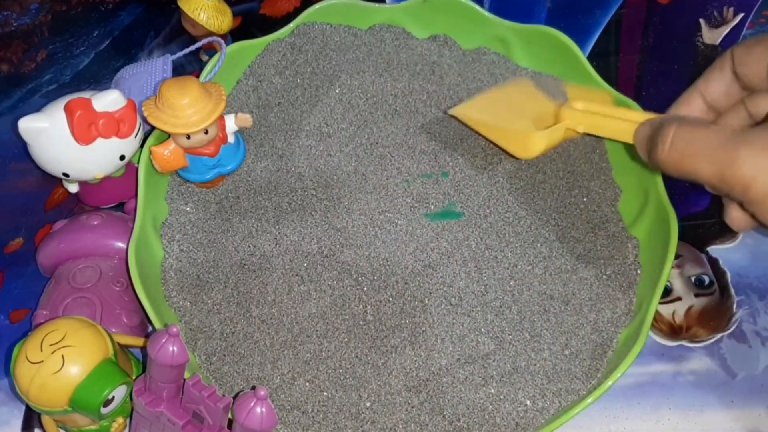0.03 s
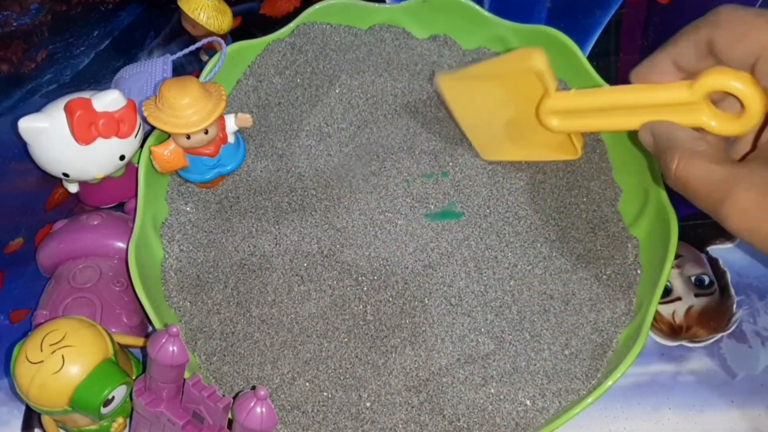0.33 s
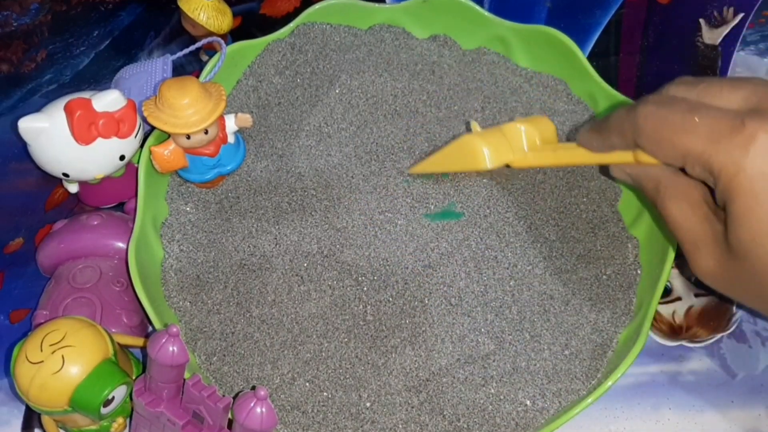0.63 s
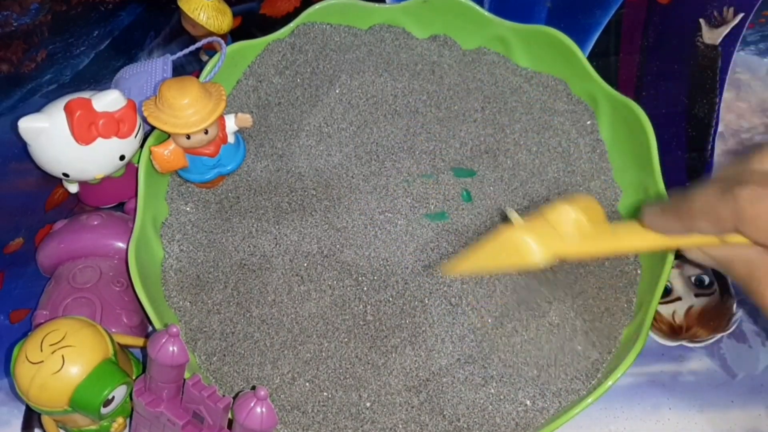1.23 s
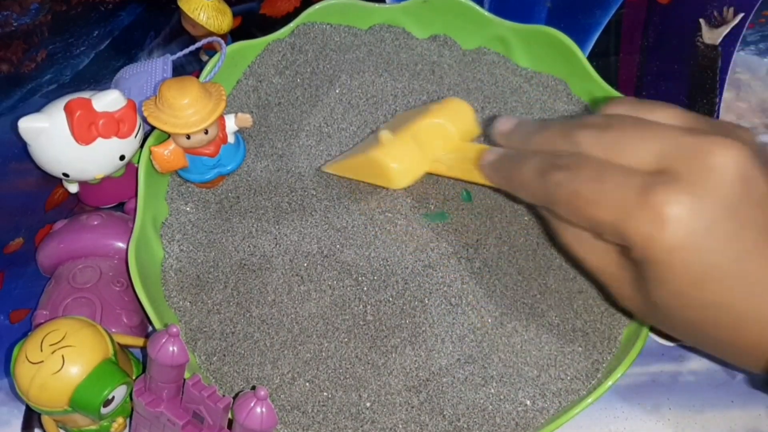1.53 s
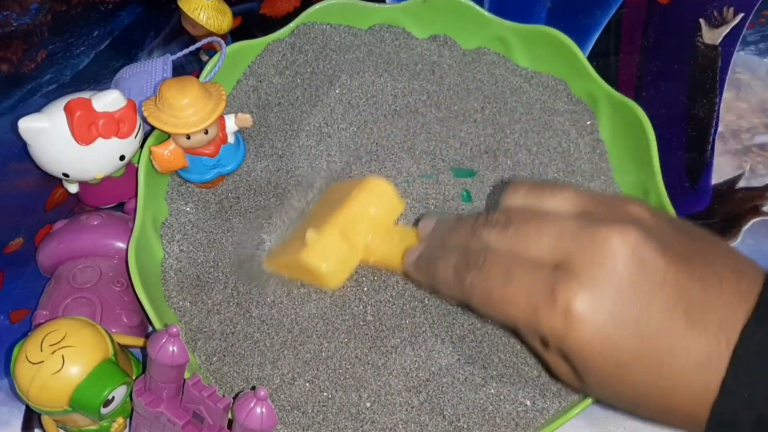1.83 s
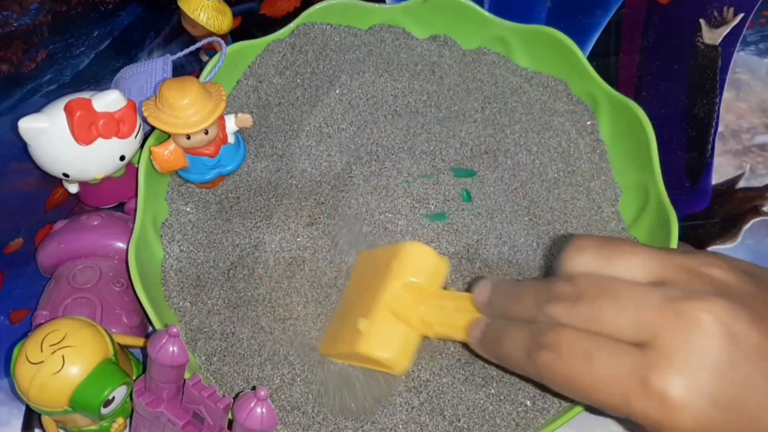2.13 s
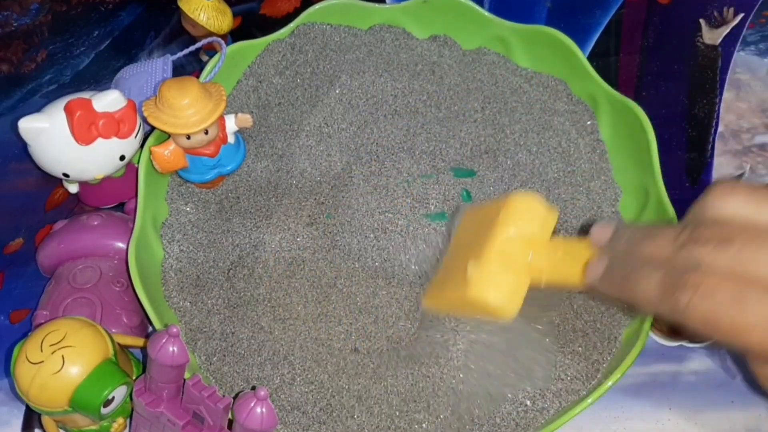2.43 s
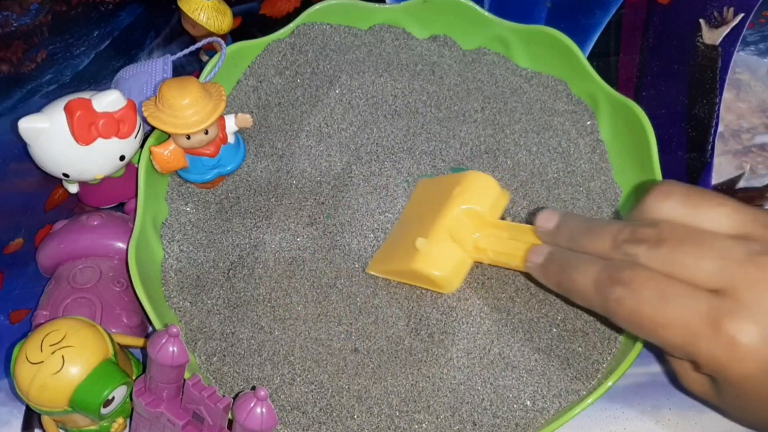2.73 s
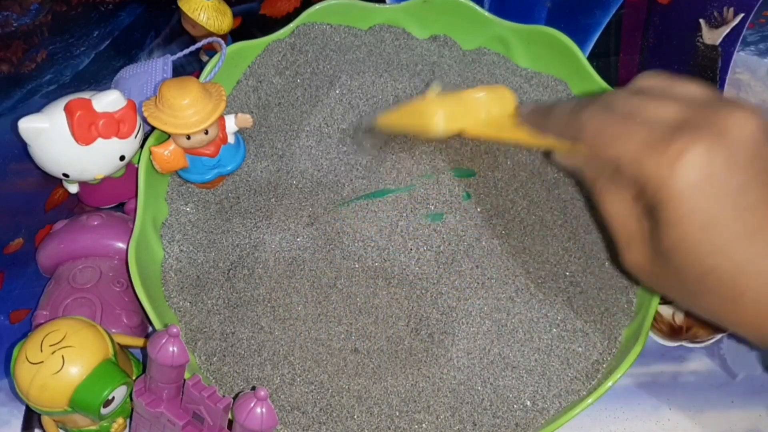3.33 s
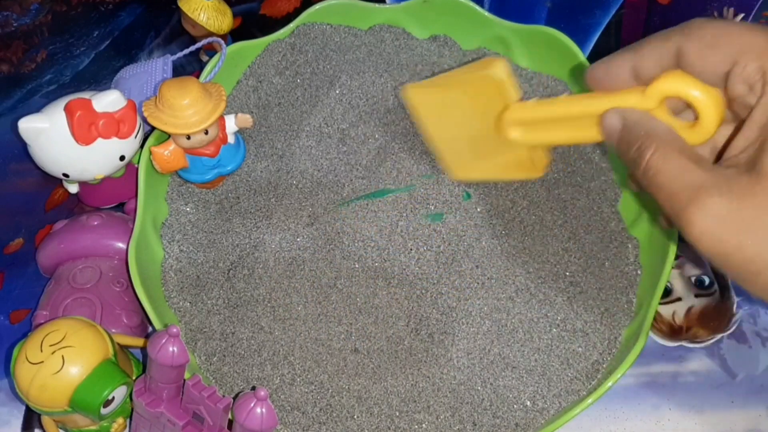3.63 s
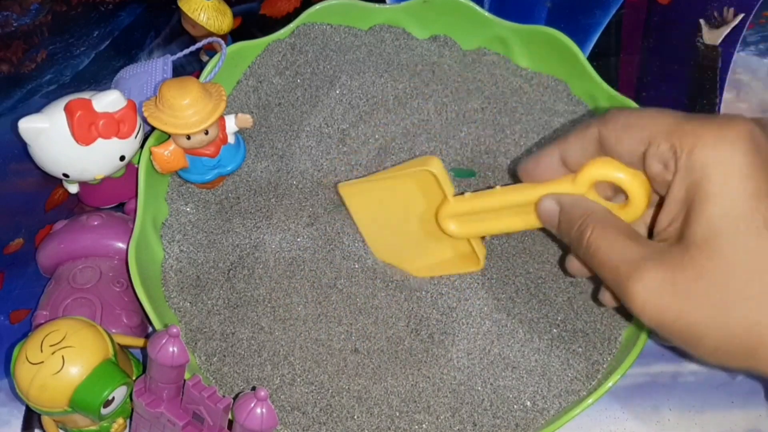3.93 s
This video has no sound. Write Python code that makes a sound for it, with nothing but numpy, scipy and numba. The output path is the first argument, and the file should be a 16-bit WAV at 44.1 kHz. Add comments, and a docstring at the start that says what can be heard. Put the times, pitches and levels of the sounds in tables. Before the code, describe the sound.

A plastic toy shovel scrapes dry sand in a tray, close by in a quiet room. A brief dab and light crunchy touches lead to a long, swelling hiss with small grain ticks, then one short final stroke.

```python
"""Toy shovel in dry sand.

A plastic shovel is dabbed and dragged through a plastic tray of sand, close by. Slipping grains hiss,
crunch and faintly ring the blade; coarse grains tick on it and the tray takes two soft bumps.
A quiet room hums behind. Near the end the sound drops out briefly; a new stroke follows, further right."""
import sys
import numpy as np
from scipy import signal
from scipy.fft import rfft, irfft
from scipy.io import wavfile
from numba import njit

SR = 44100
rng = np.random.default_rng(int(sys.argv[2]) if len(sys.argv) > 2 else 0)


def put_to_file(sound):
    """Save the sound as 16-bit audio at rate SR, in the file named by the first command-line argument."""
    columns = np.atleast_2d(sound).T  # one column per channel
    safe = np.clip(columns, -1, 1)
    whole_steps = np.round(safe * 32767)
    wavfile.write(sys.argv[1], SR, whole_steps.astype(np.int16))


N = 176400
TOP_HZ = 15700


def undb(db):
    """Decibels to gain."""
    return 10 ** (np.asarray(db) / 20)


def unit(x):
    """Scale to rms 1."""
    return x / np.sqrt(np.mean(x ** 2))


def curve(rows, column):
    """Table column, linearly interpolated in time."""
    rows = np.array(rows, float)
    return np.interp(np.arange(N) / SR, rows[:, 0], rows[:, column])


def colour(x, spectrum):
    """Filter by (f/Hz, level/dB) points; rms 1."""
    hz, db = np.array(spectrum, float).T
    bins_hz = np.maximum(np.fft.rfftfreq(N, 1 / SR), 1)
    gain = undb(np.interp(np.log(bins_hz), np.log(hz), db))
    return unit(irfft(rfft(x) * gain, N))


def pan(left_minus_right_db):
    """Constant-power stereo gains."""
    gains = undb(np.array([left_minus_right_db, -left_minus_right_db]) / 2)
    return gains / np.sqrt(np.mean(gains ** 2, axis=0))


def walk(per_s):
    """Random wander between unit-variance knots."""
    knots = rng.standard_normal(N // 20)
    return np.interp(np.arange(N) / SR * per_s, np.arange(len(knots)), knots)


@njit
def resonate(x, hz, width_hz):
    """State-variable band-pass, moving centre and width."""
    y, band_state, low_state = np.empty(len(x)), 0., 0.
    for i in range(len(x)):
        g, damping = np.tan(np.pi * hz[i] / SR), width_hz[i] / hz[i]
        band = (band_state + g * (x[i] - low_state)) / (1 + g * (g + damping))
        band_state = 2 * band - band_state
        low_state += 2 * g * band
        y[i] = damping * band
    return y


def resonate_twice(x, hz, width_hz):
    """Two band-passes in series per channel; rms 1."""
    sides = [resonate(resonate(side, hz, width_hz), hz, width_hz) for side in x]
    return unit(np.array(sides) / np.sqrt(width_hz))


def room():
    """Soft rumble and hiss with a wavering low hum."""
    # air spectrum: f/Hz, relative density/dB
    air_spectrum = [(20, -4), (90, -4.5), (160, -6), (250, -9), (400, -12), (600, -15), (900, -20.5),
                    (2500, -24), (7000, -27.5), (15000, -30.5)]
    # hum tones: f/Hz, level/dB
    hum_tones = [(60, -66.5), (164, -68)]
    air_db, shared_power = -54, 0.21
    air = np.sqrt(1 - shared_power) * rng.standard_normal((2, N))
    air += np.sqrt(shared_power) * rng.standard_normal(N)
    out = undb(air_db) * colour(air, air_spectrum)
    for hz, db in hum_tones:
        phase = 2 * np.pi * np.cumsum(hz + 3 * walk(per_s=12)) / SR
        out += undb(db) * unit(np.sin(phase) * undb(1.2 * walk(per_s=12)))
    return out


def tray_bumps():
    """The blade nudges the tray; sand damps its modes quickly."""
    # bumps: t/s, level/dB
    bumps = [(3.349, -42.5), (3.442, -49)]
    # loaded tray modes: f/Hz, relative level/dB, T60/s
    tray_modes = [(67, -9, 0.13), (105, -4.5, 0.26), (298, -6.5, 0.098), (510, 1.5, 0.019),
                  (690, -4, 0.037)]
    out = np.zeros(N)
    for start_s, bump_db in bumps:
        age_s = np.maximum(np.arange(N) / SR - start_s, 0)
        for hz, mode_db, t60_s in tray_modes:
            decay = np.exp(-np.log(1000) * age_s / t60_s)
            out += undb(bump_db + mode_db) * np.sin(2 * np.pi * hz * age_s) * decay
    return out


def grain_ticks():
    """Coarse grains snap on the blade: a dry crack, then short scatter from the tray."""
    # grain impacts: t/s, relative level/dB, centre f/Hz
    ticks = [(0.0405, -14, 6500), (.0492, -28, 5500), (0.077, -28, 5600), (.108, -37, 6000),
             (.1245, -32, 5960), (0.1487, -29, 5460), (0.155, -31, 4800), (.1923, -34.5, 5800),
             (.376, -34, 6640), (1.131, -18.5, 3600), (1.146, -28, 3900), (1.185, -29, 5400),
             (3.1968, -19, 6000)]
    snap_db, decay_s, tail_db, tail_s, relative_width = 1, 0.0007, -16.5, 0.0085, 0.53
    out, t = np.zeros((2, N)), np.arange(N // 50) / SR
    envelope = np.exp(-t / decay_s) + undb(tail_db) * np.exp(-t / tail_s)
    for start_s, db, hz in ticks:
        contact = envelope * rng.choice([-1., 1.], (2, len(t)))
        contact[:, 0] = undb(snap_db)
        centre_hz = np.full(len(t), float(hz))
        crack = np.array([resonate(side, centre_hz, relative_width * centre_hz) for side in contact])
        band_hz = [0.58 * hz, min(2.06 * hz, TOP_HZ)]
        crack = signal.sosfilt(signal.butter(4, band_hz, "band", fs=SR, output="sos"), crack)
        crack *= np.sqrt(np.sum(envelope ** 2) / np.sum(crack ** 2, axis=1, keepdims=True)) / 2
        i = int(start_s * SR)
        out[:, i:i + len(t)] += undb(db) * crack
    return out


def grains(per_s, spread_db=2.5):
    """Tiny impacts of uneven size, independent per channel."""
    hits = rng.random((2, N)) < per_s / SR
    signs = rng.choice([-1, 1], (2, N))
    sizes = undb(spread_db * np.minimum(rng.exponential(size=(2, N)), 4))
    return unit(hits * signs * sizes)


def grain_flow(crossfeed=0, coarse_db=-13):
    """Fine and coarse grains in motion."""
    impacts = grains(per_s=14000) + undb(coarse_db) * grains(per_s=260)
    return impacts + crossfeed * impacts[::-1]


def hollow_rub(effort_db):
    """Two resonances, as of air under the blade; they shift with it and narrow under pressure."""
    # rub track: t/s, relative level/dB, f/Hz
    track = [(.95, -80, 800), (1.12, -64, 950), (1.45, -65, 790), (1.67, -55.5, 760), (1.8, -64, 740),
             (2.12, -57.5, 910), (2.44, -53.5, 990), (2.8, -57, 940), (3.2, -57, 930), (3.3, -62.5, 880),
             (3.76, -69, 790), (3.88, -62, 854), (4.0, -69, 850)]
    rub_db, waver_db, overtone_ratio, overtone_db = 1, 2.5, 1.7, -13
    hz = curve(track, 2) * np.exp(0.071 * walk(per_s=40))
    width_hz = np.interp(effort_db, [-55, -36.5], [950, 405])  # light to full effort
    body = resonate_twice(grain_flow(crossfeed=0.1), hz, width_hz)
    body += undb(overtone_db) * resonate_twice(grain_flow(), hz * overtone_ratio, width_hz)
    return undb(rub_db + curve(track, 1) + waver_db * walk(per_s=110)) * body


def shovel_modes(effort_db):
    """The shovel rings more when pressed hard; its sand load detunes it."""
    # modes: f/Hz, width/Hz, relative level/dB
    modes = [(2274, 57, -3), (2730, 63, -3), (2920, 25, -8.5), (3700, 190, 0.5), (4000, 140, -8),
             (5000, 180, 1), (5700, 110, -4), (6340, 73, -1), (6460, 140, -3)]
    modes_db, full_effort_db, growth_db_per_db = -7.5, -36.5, 0.3
    detune = np.exp(0.02 * walk(per_s=5))
    impacts, ring = grain_flow(), np.zeros((2, N))
    for hz, width_hz, db in modes:
        widths_hz = np.full(N, float(width_hz))
        ring += undb(db) * np.array([resonate(side, hz * detune, widths_hz) for side in impacts])
    return undb(modes_db + growth_db_per_db * (effort_db - full_effort_db)) * unit(ring)


def rim_scatter(x, decay_s=0.0088, scatter_db=-3.5):
    """Short echoes off the tray's rim and toys; three patterns crossfade as the blade travels."""
    t, scattered = np.arange(N // 100) / SR, 0
    weights = np.array([walk(per_s=2.956) for _ in range(3)])
    for weight in weights / np.sqrt(np.sum(weights ** 2, axis=0)):
        echo = rng.standard_normal((2, len(t))) * np.exp(-t / decay_s)
        echo /= np.sqrt(np.sum(echo ** 2, axis=1, keepdims=True))
        scattered += weight * signal.fftconvolve(x, echo, axes=1)[:, :N]
    return (x + undb(scatter_db) * scattered) / np.sqrt(1 + undb(scatter_db) ** 2)


def sliding_sand():
    """Grains slip under the blade in small surges: hiss, crunch, ring and rub follow the strokes."""
    # strokes: t/s, effort level/dB, relative crunch level/dB
    dab = [(0, -38.5, -16), (.05, -45.5, -9), (.1, -53, -9), (.17, -61, -5), (.24, -68.5, -8)]
    touch = [(.7, -73.5, 1), (1.04, -64.5, -1), (1.075, -49, -8), (1.1, -51, -3), (1.127, -44.5, -2),
             (1.148, -48.5, -1), (1.16, -52, -2.5), (1.22, -49.5, -7.5), (1.295, -52, -6), (1.35, -50.5, 0),
             (1.41, -56, -5.5), (1.46, -55, -7)]
    sweep = [(1.51, -53, -3.5), (1.56, -49, -2), (1.62, -50, -4), (1.67, -45, -3.5), (1.75, -53, -2.5),
             (1.82, -54.5, -3), (1.853, -46, -3), (1.96, -44.5, -7.5), (2.28, -36, -6.5), (2.62, -34.5, -6),
             (2.72, -37.5, -5.5), (2.95, -32, -8.5), (3.2, -30.5, -7), (3.54, -45.5, -15),
             (3.63, -42, -11.5), (3.66, -45, -12)]
    last_stroke = [(3.725, -46.5, -3), (3.82, -48, -2.5), (3.857, -39, -4), (3.915, -39, -4.5),
                   (4.0, -49, -2.5)]
    # blade path: t/s, left minus right/dB, ring f/Hz
    blade_path = [(0, -1, 6900), (1.25, -1, 6340), (1.6, 0, 5030), (1.95, 1.1, 5300), (2.3, 0.5, 6530),
                  (3.2, 0, 6480), (3.62, 2, 6400), (3.72, -8.5, 5200), (4, -9.5, 5500)]
    # sand spectra: f/Hz, relative density/dB
    hiss_spectrum = [(1500, -30), (2400, -11), (3600, -8.5), (5300, 0), (6700, 0), (7900, -6.5), (8800, -5),
                     (11500, -7.5), (14000, -12), (15600, -14.5)]
    crunch_spectrum = [(400, -22.5), (1400, -20), (1850, -13.5), (2250, -5.5), (3000, 0), (3750, 2.5),
                       (4500, -1), (6000, -20.5)]
    hiss_db, crunch_db, ring_db, ring_width_hz = 2, 1.5, -6.5, 1150.
    strokes = [*dab, *touch, *sweep, *last_stroke]
    effort_db = curve(strokes, 1)
    surge_db = 0.88 * walk(per_s=130) + 0.5 * walk(per_s=22.12)
    hiss = undb(hiss_db) * colour(grain_flow(), hiss_spectrum)
    crunch = undb(crunch_db + curve(strokes, 2)) * colour(grain_flow(crossfeed=0.1), crunch_spectrum)
    ring = undb(ring_db) * resonate_twice(grain_flow(), curve(blade_path, 2), np.full(N, ring_width_hz))
    scrape = undb(effort_db) * (hiss + crunch + ring + shovel_modes(effort_db))
    sand = undb(surge_db) * (scrape + hollow_rub(effort_db))
    return rim_scatter(sand) * pan(curve(blade_path, 1))


def scene():
    """Sand, shovel, tray and room; stereo."""
    return sliding_sand() + grain_ticks() + tray_bumps() + room()


def record(dry):
    """One brief level dip and a steep low-pass."""
    start_s, end_s, fade_s, dip_db = 3.67, 3.714, 0.024, -43.5
    t = np.arange(N) / SR
    dip = np.clip(np.minimum(t - start_s, end_s - t) / fade_s + 0.5, 0, 1)
    lowpass = signal.ellip(10, 0.2, 80, TOP_HZ, fs=SR, output="sos")
    return signal.sosfilt(lowpass, dry * undb(dip_db * dip))


dry = scene()
out = record(dry)
put_to_file(out)
```